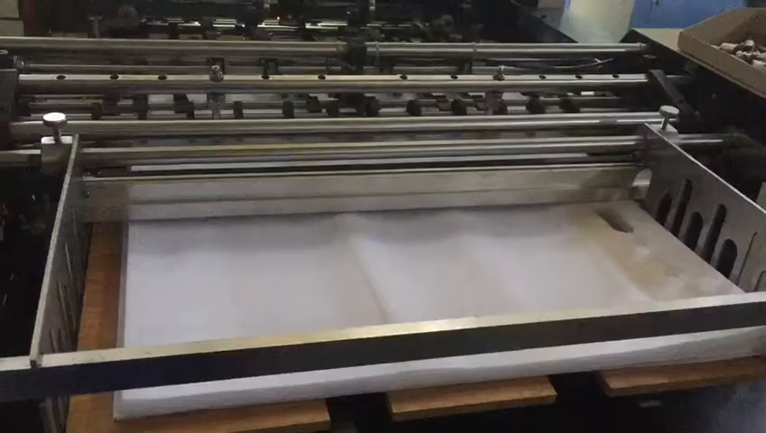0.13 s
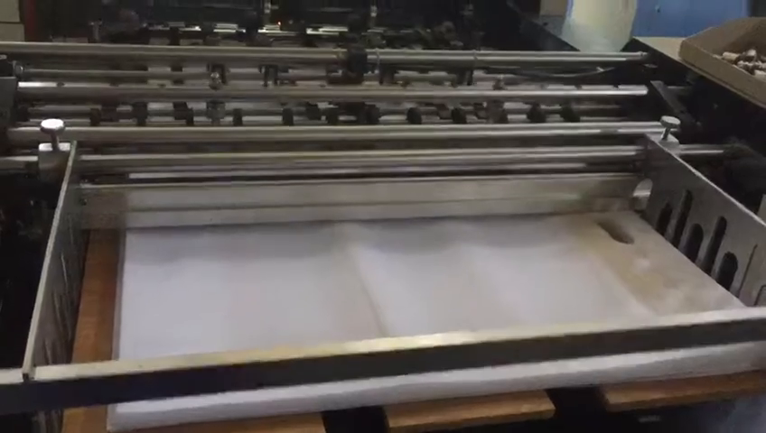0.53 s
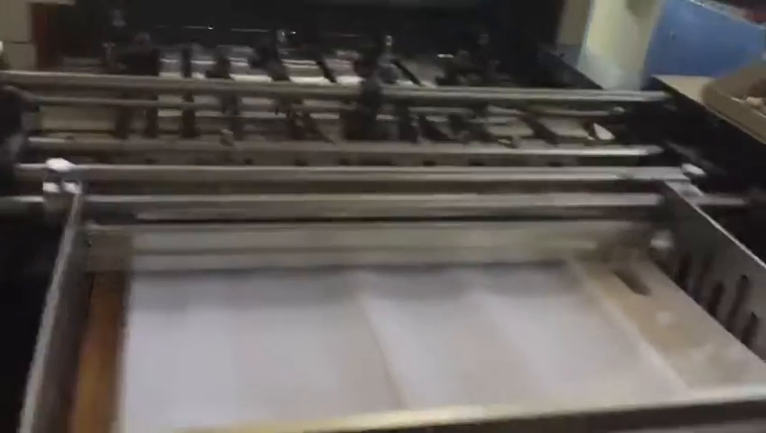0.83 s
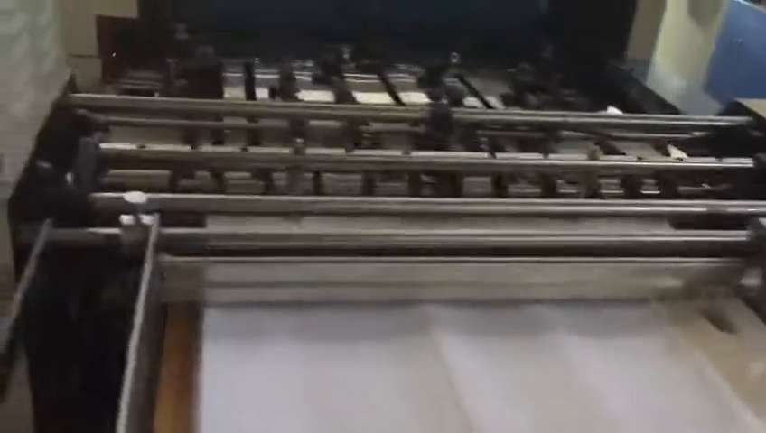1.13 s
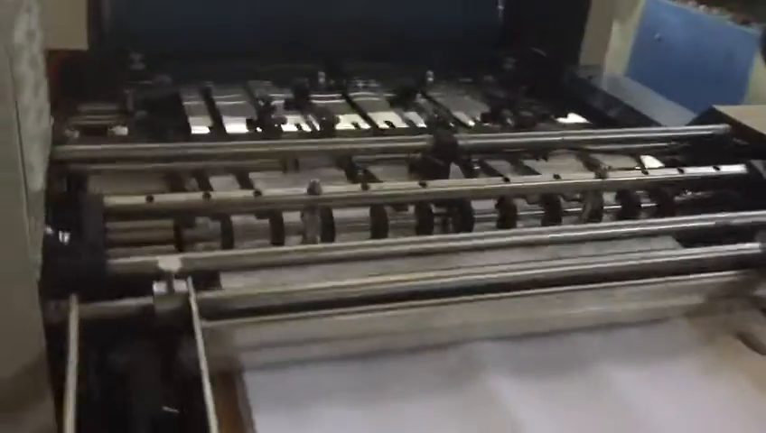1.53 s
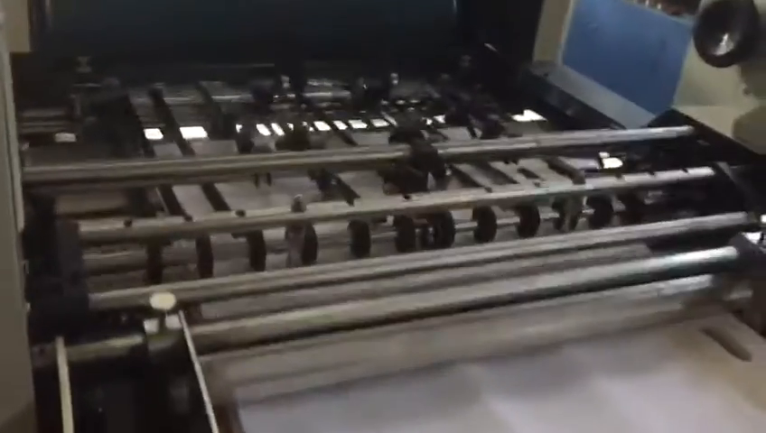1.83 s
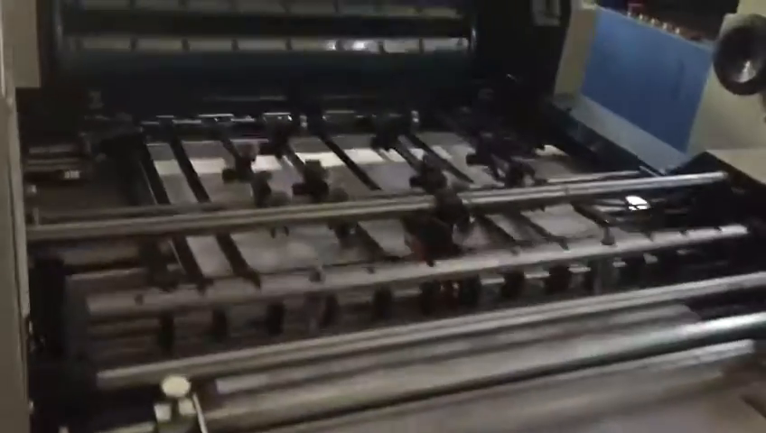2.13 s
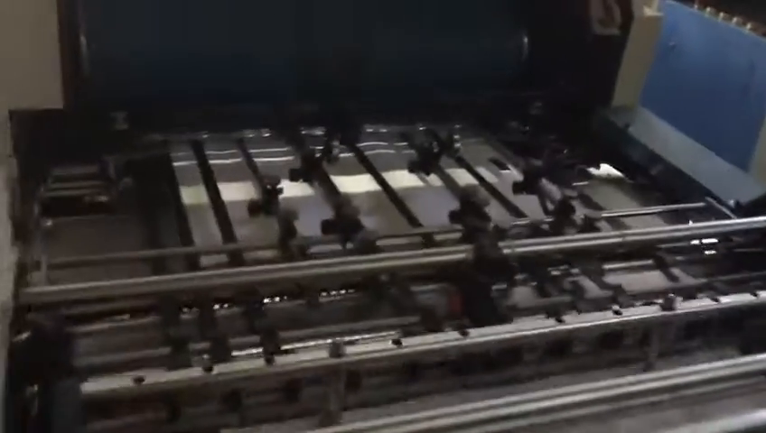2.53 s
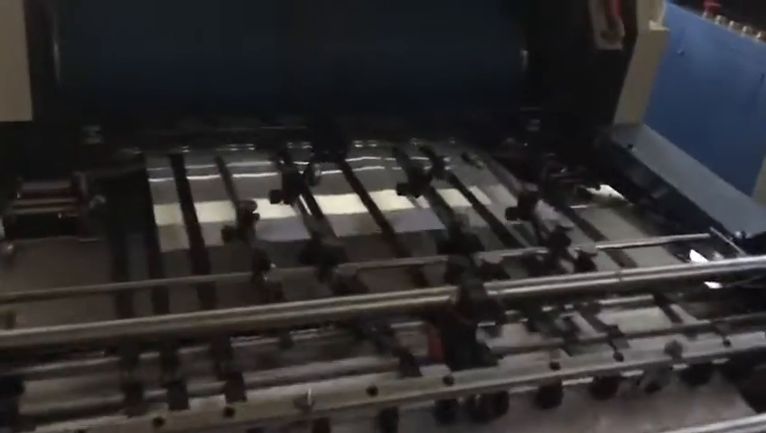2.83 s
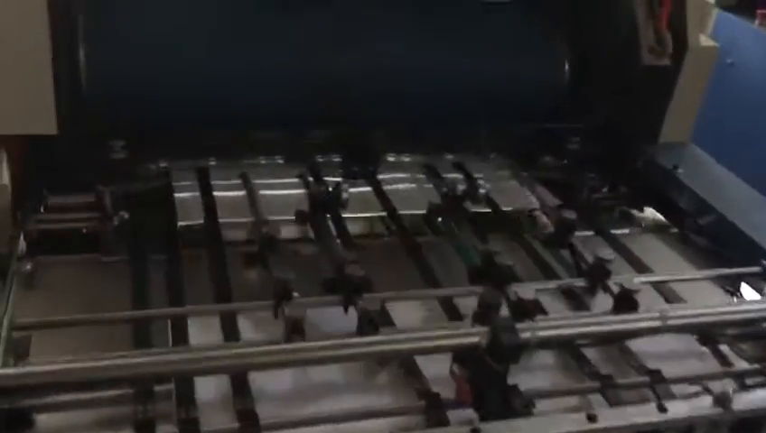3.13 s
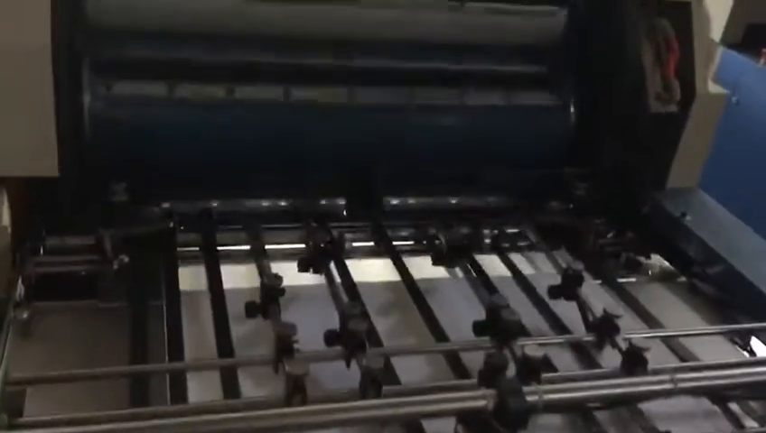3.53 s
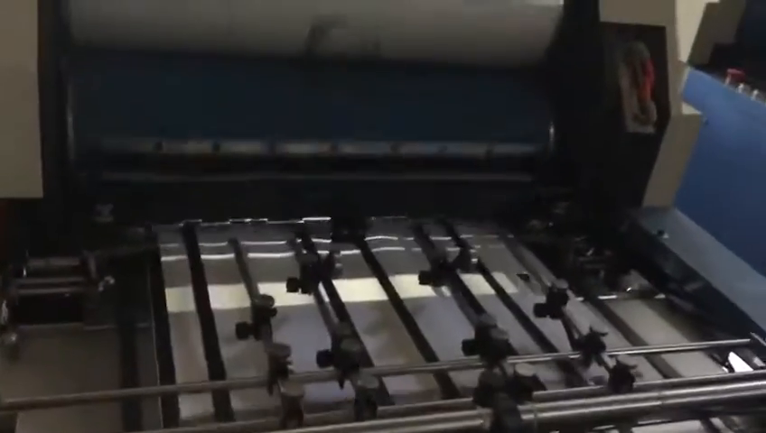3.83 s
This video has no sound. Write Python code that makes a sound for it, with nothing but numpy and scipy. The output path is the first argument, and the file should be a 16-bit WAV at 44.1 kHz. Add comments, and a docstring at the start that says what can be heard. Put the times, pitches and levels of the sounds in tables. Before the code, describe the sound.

A printing press runs close by in a workshop: low pump hum and broad roar, a brief fading ring at first, then irregular knocks and ticks, with one loud metal clack around one second.

```python
"""A ring dying away over pump hum and a broad roar is heard first: a sheet-fed printing press in a workshop.
Microphone close over the feed table. The pump and whines are wandering sines; rollers, belts and
suction air are bands of flickering noise; rattling parts are dense clicks that ring. Cams and grippers
knock and tip in short noise bursts, the frame thuds, and one hard metal clack rings out near 1 s.
The workshop adds a short dull tail."""
import sys
import numpy as np
from scipy import signal
from scipy.io import wavfile

SR = 44100
rng = np.random.default_rng(int(sys.argv[2]) if len(sys.argv) > 2 else 0)


def transcribe(signal):
    """Save signal, clipped to [-1, 1], as a 16-bit WAV file at the path in sys.argv[1]."""
    frames = np.atleast_2d(signal).T
    limited = np.clip(frames, -1, 1)
    pcm = np.round(limited * 32767).astype(np.int16)
    wavfile.write(sys.argv[1], SR, pcm)


N = 176400
START_S = 0.072   # the sound sets in


def amp(db):
    """Level in dB to amplitude."""
    return 10 ** (np.asarray(db) / 20)


def rms_one(x):
    """Scale a sound to an rms of 1."""
    return x / np.sqrt(np.mean(x ** 2) + 1e-20)


def in_time(rows):
    """Draw each column of a table as straight lines over time, the first column."""
    s, *columns = np.transpose(rows)
    return [np.interp(np.arange(N) / SR, s, c) for c in columns]


def drift(rate_hz):
    """Slow random wander of spread 1: noise through two equal low-pass poles at rate_hz."""
    step = 40   # samples between the points of the wander
    pole = np.exp(-2 * np.pi * rate_hz * step / SR)
    noise = rng.standard_normal(N // step + 2002)
    slow = signal.lfilter([1], [1, -2 * pole, pole * pole], noise)[2000:]   # settled part
    return np.interp(np.arange(N) / step, np.arange(len(slow)), rms_one(slow - slow.mean()))


def band(x, low_hz, high_hz):
    """Keep the sound between two frequencies."""
    return signal.sosfilt(signal.butter(2, [low_hz, high_hz], "band", fs=SR, output="sos"), x)


def ring(clicks, hz, t60_s):
    """A resonator: a unit click sets a dying sine of height about 1 ringing."""
    r, w = amp(-60 / (t60_s * SR)), 2 * np.pi * hz / SR
    return signal.lfilter([0, np.sin(w)], [1, -2 * r * np.cos(w), r * r], clicks + 1e-18)


def dying_tone(t, hz, db, t60_s, rise_s):
    """A sine that rises quickly and falls by 60 dB in t60_s."""
    return amp(db - 60 * t / t60_s) * (1 - np.exp(-t / rise_s)) * np.sin(2 * np.pi * hz * t)


def add(out, s, sound):
    """Mix a sound in at s seconds, cut at the end."""
    i = int(s * SR)
    out[i:i + len(sound)] += sound[:N - i]


# Ring heard as the sound sets in: (frequency [Hz], level [dB], t60 [s])
FADING_RING = (1007, -26, .42)


def fading_ring():
    """One struck-like tone dies away from the start."""
    out, t = np.zeros(N), np.arange(SR // 2) / SR
    hz, db, t60_s = FADING_RING
    add(out, START_S, dying_tone(t, hz, db, t60_s, rise_s=0.00052))
    return out


PULSE_HZ, PULSE_WANDER = 79, 0.00412   # pump pulse rate; its wander as a share of the rate
HUM_WAVER_DB, FOURTH_FLUTTER_DB = 4, 2.5
# Pump hum at the second multiple of the pulse: (time [s], level [dB rms])
HUM_SECOND = [(0.08, -36), (0.44, -31.5), (0.81, -44), (0.84, -62), (1.03, -29.5), (1.13, -48), (1.25, -32),
              (1.3, -39), (1.35, -32.5), (2.12, -32), (2.16, -50), (2.57, -30), (2.61, -34), (2.75, -42),
              (2.87, -29.5), (3.02, -38.5), (3.21, -29.5), (3.65, -30), (3.72, -50), (3.86, -34),
              (3.91, -42.5), (4.0, -34)]
# Pump hum at the third multiple: (time [s], level [dB rms])
HUM_THIRD = [(0.1, -55), (0.15, -36), (0.78, -47), (1.04, -27.5), (1.1, -55), (1.29, -33), (1.42, -57),
             (2.14, -42), (3.92, -45), (4.0, -50)]
# Pump hum at the fourth multiple, before its flutter: (time [s], level [dB rms])
HUM_FOURTH = [(0.1, -55), (0.29, -31.5), (0.34, -52), (0.54, -35.5), (0.95, -40), (2.23, -36.5),
              (2.35, -60), (2.51, -33), (2.55, -62), (2.84, -35.5), (3.39, -35.5), (3.42, -55),
              (3.5, -35.5), (3.71, -34), (3.91, -51), (4.0, -26.5)]
# Higher multiples of the pulse, before their waver: (multiple, level [dB rms])
HUM_ORDERS = [(5, -45.5), (6, -53)]


def pump():
    """Air pump and drive hum: multiples of one slightly wandering pulse rate."""
    phase = 2 * np.pi * np.cumsum(PULSE_HZ * (1 + PULSE_WANDER * drift(2.7))) / SR
    second_db, third_db, fourth_db = in_time(HUM_SECOND)[0], in_time(HUM_THIRD)[0], in_time(HUM_FOURTH)[0]
    hum = amp(second_db) * np.sin(2 * phase)
    hum += amp(third_db) * np.sin(3 * phase + 2)
    hum += amp(fourth_db + FOURTH_FLUTTER_DB * drift(12)) * np.sin(4 * phase + 1)
    for multiple, db in HUM_ORDERS:
        level = amp(db + HUM_WAVER_DB * drift(2.7))
        hum += level * np.sin(round(multiple) * phase + rng.uniform(0, 2 * np.pi))
    return np.sqrt(2) * hum   # sine height to rms


ROAR_BASS_DB = -32.5   # rms of the roar below 600 Hz, held steady
# Colour of the roar, relative within each zone: (frequency [Hz], density [dB per Hz])
ROAR_COLOUR = [(15, -63), (25, -33), (76, -14), (124, -12.5), (156, -5), (192, -6.5), (236, -9), (283, -7),
               (313, -5.5), (360, -9), (430, -16), (600, -16), (800, -17.5), (1000, -16), (1400, -17),
               (2050, -20), (2500, -30), (2900, -30.5), (3500, -29), (4200, -32.5), (5000, -29.5),
               (6000, -28), (7000, -33.5), (8500, -32.5), (9600, -36), (10500, -39), (11500, -54),
               (12500, -90)]
# Level of the roar by zone:
# (time [s], 0.6-2.3 kHz level [dB rms], 2.3-5 kHz level [dB rms], above 5 kHz level [dB rms])
ROAR_LEVEL = [ (.08, -33.5, -39.5, -44.5), (.25, -33.5, -39.5, -45), (.42, -33.5, -39.5, -44.5),
              (.45, -26.5, -33, -34.5), (.62, -31.5, -34.5, -40.5), (.84, -30.5, -37.5, -42),
              (1.17, -31.5, -38.5, -40), (1.36, -32.5, -40.5, -40), (1.6, -36, -41, -41.5),
              (1.85, -35.5, -42.5, -43), (2.0, -36, -42, -41.5), (2.19, -31, -36.5, -43),
              (2.45, -35, -39, -40.5), (2.61, -36, -40, -40.5), (3.0, -34.5, -39.5, -40),
              (3.4, -36.5, -40, -41), (3.68, -33, -35.5, -40), (4.0, -35, -37, -42)]


def roar(patchy_db, shared_db):
    """Rollers, belts and suction air: quarter-octave noise bands, flickering alone and together."""
    levels_db = [ROAR_BASS_DB] + in_time(ROAR_LEVEL)
    zones, together = np.zeros((4, N)), drift(12)
    edges_hz = 22 * 2 ** np.arange(0, 9.3, 1 / 4)
    white = rng.standard_normal((2, N))
    colour_hz, colour_db = np.transpose(ROAR_COLOUR)
    for k, (low, high) in enumerate(zip(edges_hz, edges_hz[1:])):
        hz = np.sqrt(low * high)
        db = np.interp(np.log(hz), np.log(colour_hz), colour_db)
        zone = int(hz > 600) + int(hz > 2300) + int(hz > 5000)
        flicker_db = shared_db * together + patchy_db * drift(6.2)
        zones[zone] += amp(db + flicker_db) * band(white[k % 2], low, high)   # neighbours differ in noise
    return sum(amp(db) * rms_one(zone) for db, zone in zip(levels_db, zones))


TICK_SPREAD_DB = 3   # scale of the random spread in touch size
LINKS_PER_S, LINKS_DB, LINKS_CYCLES = 500, -50, 100   # mean rate, rms level, ring t60 in cycles
CLATTER_PER_S, CLATTER_DB, CLATTER_CYCLES, CLATTER_CLUMP_DB = 300, -36, 88, 4


def ticks(per_s, db, cycles, low_hz, high_hz, clump_db):
    """Parts rattle densely, in clumps, each touch ringing at a random pitch."""
    spread_db = TICK_SPREAD_DB * np.minimum(rng.exponential(1, N), 3)
    sizes = amp(spread_db) * rng.choice([-1, 1], N)
    born = rng.random(N) < per_s * amp(clump_db * drift(8)) / SR
    pitches_hz, dealt = np.geomspace(low_hz, high_hz, 24), rng.integers(0, 24, N)
    rattle = np.zeros(N)
    for k, hz in enumerate(pitches_hz):
        rattle += ring(sizes * born * (dealt == k), hz, cycles / hz)
    return amp(db) * rms_one(rattle)


GEAR_HZ = 2063
WHINE_WAVER_DB, WHINE_ROUGH_RAD = 2.5, 0.9   # level wander; phase wander
# Gear whine at GEAR_HZ, before its waver: (time [s], level [dB rms])
GEAR_WHINE = [(0.1, -66), (0.69, -38), (0.84, -51), (0.87, -49), (1.86, -53), (2.04, -41.5), (2.45, -46),
              (2.7, -41), (2.85, -52), (2.97, -45.5), (3.93, -47.5), (4.0, -52)]
# Other whines of gears and motor, before their waver: (frequency [Hz], level [dB rms])
WHINES = [(1810, -53), (1938, -53), (4000, -58), (4813, -60), (5895, -56), (6105, -57)]


def rough_tone(hz):
    """A sine of rms 1 whose phase wanders."""
    t = np.arange(N) / SR
    return np.sqrt(2) * np.sin(2 * np.pi * hz * t + WHINE_ROUGH_RAD * drift(5.3))


def whines():
    """Gears and motor: thin, slightly rough tones that swell and sink."""
    out = amp(in_time(GEAR_WHINE)[0] + 2 * WHINE_WAVER_DB * drift(15)) * rough_tone(GEAR_HZ)
    for hz, db in WHINES:
        out += amp(db + WHINE_WAVER_DB * drift(3.3)) * rough_tone(hz)
    return out


TIP_T60_S, TIP_GAIN_DB = 0.023, -5
TIP_WIDTH = 0.24   # the band reaches this share past the centre
# Small bright ticks of grippers and wheels:
# (time [s], peak level before TIP_GAIN_DB [dB], centre frequency [Hz])
TIPS = [(0.3408, -34, 6100), (0.4406, -32, 7360), (0.5164, -27, 5600), (0.7285, -32, 6620),
        (0.8092, -22, 5970), (0.8312, -26, 8340), (0.8656, -25, 6690), (0.938, -22, 6270),
        (1.003, -19, 6660), (1.1754, -22, 5900), (1.2452, -21, 6140), (1.325, -20, 6220),
        (1.4423, -27, 5890), (1.6207, -26, 5570), (1.7042, -39, 5890), (1.9671, -28, 7780),
        (2.2325, -31, 5650), (2.3274, -21, 6100), (2.38, -28, 6750), (2.439, -18.5, 6900),
        (2.4899, -27, 5520), (2.5428, -22.5, 9200), (2.6026, -25, 5980), (2.6685, -31, 9440),
        (2.7408, -31, 7460), (2.7563, -25, 6000), (2.8423, -9, 6370), (2.9268, -23, 5900),
        (3.2182, -34, 5900), (3.4836, -33, 7730), (3.763, -29, 6710), (3.8388, -30, 6050),
        (3.8997, -36, 6100), (3.9571, -31, 5900)]


def tips():
    """Grippers and wheels: very short noise bursts around each tick's pitch."""
    out, t = np.zeros(N), np.arange(SR // 10) / SR
    for s, db, hz in TIPS:
        burst = rng.standard_normal(len(t)) * amp(-60 * t / TIP_T60_S)
        burst = band(burst, hz / (1 + TIP_WIDTH), hz * (1 + TIP_WIDTH))
        add(out, s, amp(db + TIP_GAIN_DB) * burst / np.abs(burst).max())
    return out


KNOCK_ATTACK_S = 0.0019
KNOCK_EDGE_FASTER, KNOCK_BODY_T60_SHARE = 1.48, 0.77   # both fall faster than the middle
KNOCK_RING_WIDTH_HZ, KNOCK_RING_DB = 420, 0   # ring level relative to the middle's noise
SNAP_DB, SNAP_T60_S = 5, 0.02   # snap at the start of each knock, relative to its middle
MIDDLE_RMS_DB = -9.5   # nominal peak to rms
# Knocks of cams and grippers: (time [s], nominal middle peak level [dB], body level [dB rms],
# edge level [dB rms], ring centre frequency [Hz], t60 of the middle [s])
KNOCKS = [(0.43, -32, -33, -36, 3120, 0.17), (0.4385, -16, -38, -29, 4570, 0.18),
          (0.4641, -23, -21.5, -30.5, 4300, 0.17), (0.504, -37, -22, -33, 2090, 0.14),
          (0.5247, -18.5, -23.5, -31, 3220, 0.17), (0.5548, -15, -31, -47, 1970, 0.085),
          (0.7292, -17, -25.5, -48, 3970, 0.14), (0.8104, -26, -38, -36, 2340, 0.13),
          (0.8669, -16.5, -29, -46, 3700, 0.11), (1.004, -6, -12, -20.5, 3400, 0.13),
          (1.2212, -31, -26.5, -50, 2070, 0.41), (1.2471, -15, -23, -30.5, 3300, 0.1),
          (1.3255, -30, -18.5, -25, 2310, 0.076), (1.7031, -19, -45, -53, 2400, 0.12),
          (1.9664, -27, -31, -43, 3220, 0.13), (2.0126, -20.5, -40, -45, 2090, 0.14),
          (2.0752, -22, -33, -44, 2440, 0.1), (2.2498, -17.5, -26, -40, 2340, 0.087),
          (2.3282, -28, -34, -43, 2610, 0.18), (2.38, -16.5, -27, -40, 3780, 0.069),
          (2.6582, -26, -27, -34, 2050, 0.13), (2.7394, -23, -24.5, -48, 2060, 0.17),
          (2.7551, -20.5, -30, -34, 2210, 0.19), (2.8414, -24, -22.5, -30, 4060, 0.17),
          (3.2187, -16, -26, -50, 2480, 0.094), (3.482, -33, -23.5, -38, 2060, 0.31),
          (3.6218, -30, -22.5, -46, 2120, 0.11), (3.7648, -14.5, -34, -50, 2050, 0.093),
          (3.8403, -26, -26.5, -35, 2400, 0.19), (3.899, -14.5, -24.5, -41, 2120, 0.093)]


def knocks():
    """Cams and grippers: each a dying burst of dull body, ringing middle, bright edge and first snap."""
    out, t = np.zeros(N), np.arange(SR // 3) / SR
    for s, middle_db, body_db, edge_db, hz, t60_s in KNOCKS:
        noise = rng.standard_normal((4, len(t)))
        rise, fall_db = 1 - np.exp(-t / KNOCK_ATTACK_S), -60 * t / t60_s
        half_hz = KNOCK_RING_WIDTH_HZ / 2
        ringing = rms_one(band(noise[3], hz - half_hz, hz + half_hz))
        middle = rms_one(rms_one(band(noise[0], 2300, 4800)) + amp(KNOCK_RING_DB) * ringing)
        snap = amp(SNAP_DB - 60 * t / SNAP_T60_S) * rms_one(band(noise[1], 1500, 7000))
        edge = amp(edge_db + fall_db * KNOCK_EDGE_FASTER) * rms_one(band(noise[1], 4750, 9200))
        body = amp(body_db + fall_db / KNOCK_BODY_T60_SHARE) * rms_one(band(noise[2], 510, 1950))
        front = amp(middle_db + MIDDLE_RMS_DB) * (amp(fall_db) * middle + snap)
        add(out, s, rise * (front + edge + body))
    return out


THUD_RISE_S = 0.004
THUD_WIDTH, THUD_TONE_DB = 0.12, -0.5   # rumble half-width as share of pitch; height of the struck tone
# Dull thuds and short rumbles through the frame:
# (time [s], rumble level [dB rms], frequency [Hz], t60 [s])
THUDS = [(.455, -23, 944, 0.23), (.51, -20.5, 301, 0.55), (.517, -19, 824, 0.12), (.52, -23, 598, 0.18),
         (.55, -25, 1660, 0.11), (.768, -30, 947, 0.22), (1.336, -21, 157.5, 0.16), (1.97, -35, 1590, 0.8),
         (1.974, -37, 3200, 0.34), (1.985, -33, 792, 0.61), (2.347, -23.5, 587, 0.16),
         (2.632, -29, 1314, 0.089), (2.74, -27.5, 1134, 0.17), (2.852, -22, 155, 0.18),
         (3.412, -24, 1143, .08), (3.486, -22, 865, 0.093), (3.766, -26, 470, 0.12),
         (3.881, -27.5, 451, .15), (3.895, -23, 1082, 0.086), (3.93, -28.5, 175, 0.47)]


def thuds():
    """The frame: a struck tone and narrow noise around it rise and die together."""
    out, t = np.zeros(N), np.arange(SR // 2) / SR
    for s, db, hz, t60_s in THUDS:
        noise = rng.standard_normal(len(t))
        rumble = rms_one(band(noise, hz / (1 + THUD_WIDTH), hz * (1 + THUD_WIDTH)))
        struck = amp(THUD_TONE_DB) * np.sin(2 * np.pi * hz * t)
        add(out, s, amp(db - 60 * t / t60_s) * (1 - np.exp(-t / THUD_RISE_S)) * (rumble + struck))
    return out


CRACK_DB, CRACK_T60_S = -15, 0.035   # the clack's first broadband snap
# The hard clack: (time [s], reference level of its modes [dB])
CLACK = (1.0047, -14)
# Modes of the metal part it rings: (frequency [Hz], level relative to the clack [dB], t60 [s])
CLACK_MODES = [(902, -2.5, 0.15), (940, -4, 0.13), (1195, -10, 0.25), (1458, -13.5, 0.25),
               (1963, 2.5, 0.065), (3300, -0.5, 0.045), (4830, 0, 0.069)]


def clack():
    """A hard hit: a broadband crack while the modes of a metal part ring down."""
    out, t = np.zeros(N), np.arange(SR // 2) / SR
    s, clack_db = CLACK
    for hz, db, t60_s in CLACK_MODES:
        add(out, s, dying_tone(t, hz, clack_db + db, t60_s, rise_s=0.0013))
    noise = rms_one(band(rng.standard_normal(len(t)), 1300, 7800))
    add(out, s, amp(CRACK_DB - 60 * t / CRACK_T60_S) * noise)
    return out


SHOP_T60_S, SHOP_DB = 0.27, -15.5


def shop(x):
    """Workshop around the press: a diffuse tail of dying noise, beginning 12 ms after each sound."""
    t = np.arange(SR // 2) / SR
    tail = band(rng.standard_normal(len(t)), 340, 12000) * amp(-60 * t / SHOP_T60_S) * (t > 0.012)
    return signal.fftconvolve(x, tail / np.sqrt(np.sum(tail ** 2)))[:N]


def scene():
    """The press over the feed table; only rings, rattles and hits get the workshop's tail."""
    links = ticks(LINKS_PER_S, LINKS_DB, LINKS_CYCLES, 2500, 10000, clump_db=3)
    cams = ticks(CLATTER_PER_S, CLATTER_DB, CLATTER_CYCLES, 420, 2600, CLATTER_CLUMP_DB)
    hits = fading_ring() + links + cams + tips() + knocks() + thuds() + clack()
    steady = pump() + roar(patchy_db=1.0, shared_db=0.4) + whines()
    return (hits + amp(SHOP_DB) * shop(hits) + steady)[None]


PEAK_TOP, CUTOFF_HZ = 0.9, 11850   # ceiling of the rounded peaks; top of the treble


def record(dry):
    """Microphone input: the stage rounds peaks, the top is cut steeply, silence holds until the start."""
    rounded = PEAK_TOP * np.tanh(dry / PEAK_TOP)
    cut = signal.sosfilt(signal.ellip(12, 0.5, 75, CUTOFF_HZ, fs=SR, output="sos"), rounded)
    return cut * np.clip((np.arange(N) / SR - START_S) / 0.0011, 0, 1)   # opens within 1.1 ms


dry = scene()
out = record(dry)
transcribe(out)
```